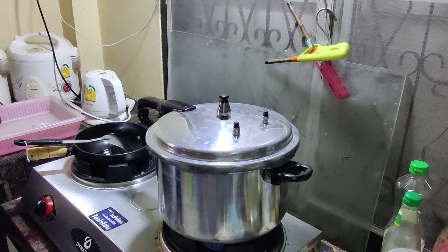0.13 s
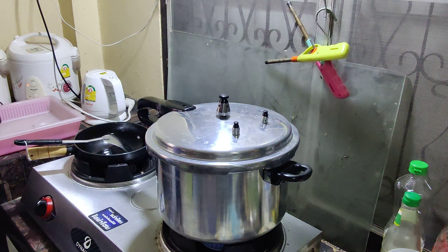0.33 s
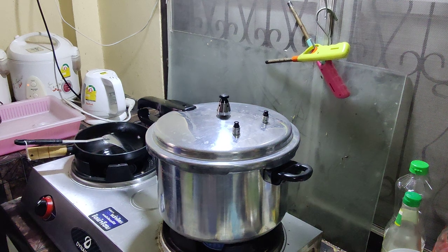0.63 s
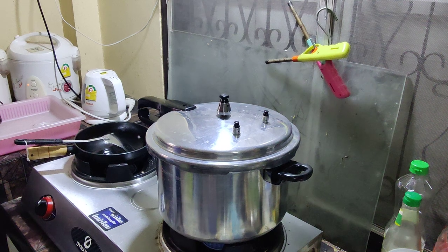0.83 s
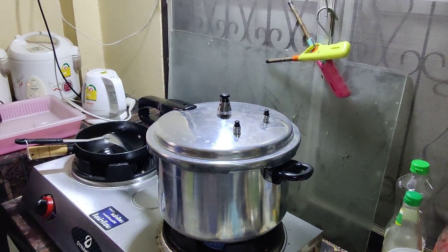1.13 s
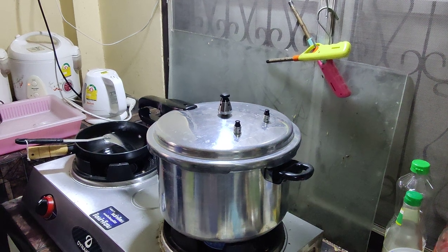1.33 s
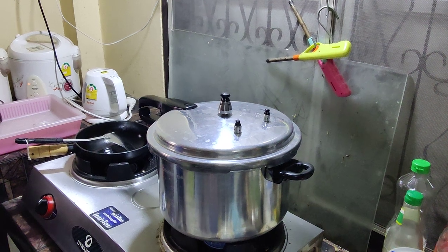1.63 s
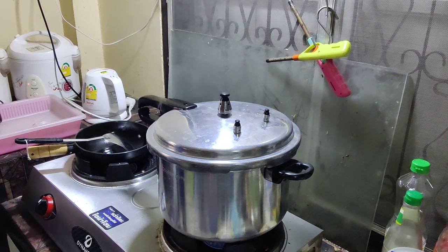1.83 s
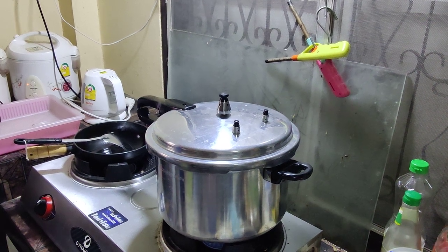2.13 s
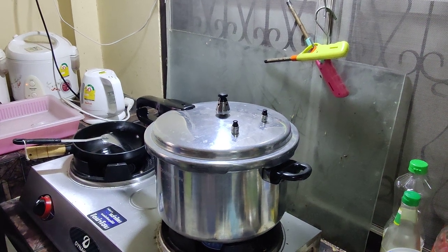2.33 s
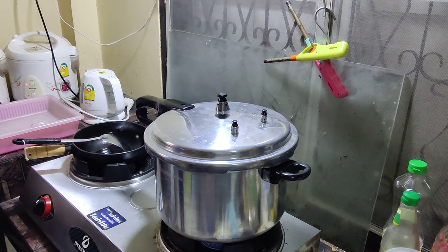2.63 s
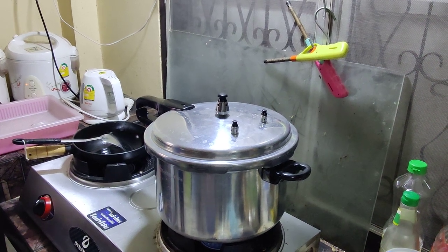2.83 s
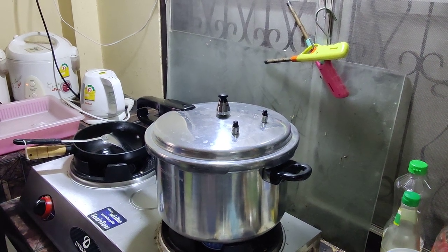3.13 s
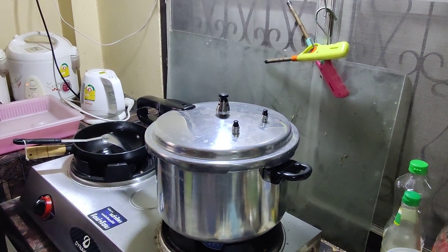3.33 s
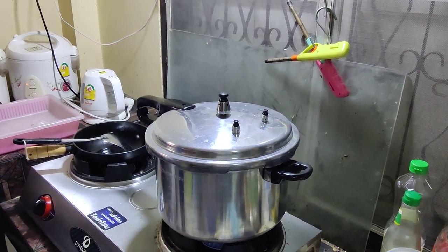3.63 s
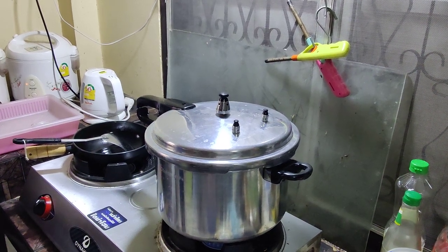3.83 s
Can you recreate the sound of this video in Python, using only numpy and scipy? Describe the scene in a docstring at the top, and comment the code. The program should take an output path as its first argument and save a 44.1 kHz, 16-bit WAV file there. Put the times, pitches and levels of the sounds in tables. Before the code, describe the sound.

Rhythmic hissing steam puffs from a pressure cooker on a gas stove, a bird chirping later

```python
"""Pressure cooker on a gas ring.

A weight valve in a small kitchen lets out soft puffs of steam almost four times a second: shaped stereo noise
over a steady leak. The flame rushes below as banded noise, faint wavering sines hum, and two deep
sines drone, swelling and sinking. Outside a bird gives five falling chirps with thin notes between, as gliding sines.
The sound fades in over the first second."""
import sys
import numpy as np
from scipy import signal
from scipy.io import wavfile

SR = 44100
rng = np.random.default_rng(int(sys.argv[2]) if len(sys.argv) > 2 else 0)


def master(y):
    """Save y as 16-bit WAV."""
    cut = np.clip(np.atleast_2d(y).T, -1, 1)
    pcm = np.round(cut * 32767)  # scale
    wavfile.write(sys.argv[1], SR, pcm.astype(np.int16))


N = 176400
TIME_S = np.arange(N) / SR


def from_db(db):
    """Decibels to amplitude gain."""
    return 10 ** (np.asarray(db) / 20)


def rms_one(x):
    """Scale to rms 1."""
    return x / np.sqrt(np.mean(x ** 2) + 1e-20)


def in_time(rows):
    """Interpolate (s, value) rows at every sample."""
    return np.interp(TIME_S, *np.transpose(rows))


def at_hz(points, hz):
    """Interpolate (Hz, value) rows on a log-frequency axis."""
    points_hz, values = np.transpose(points)
    return np.interp(np.log(hz), np.log(points_hz), values)


def pan(left_minus_right_db):
    """Left and right gains for a level difference, at constant power."""
    half_db = left_minus_right_db / 2
    return rms_one(from_db(np.array([[half_db], [-half_db]])))


def drift(rate_hz):
    """Random wander of rms 1: noise through two equal low-pass poles, run at SR / 40."""
    step, settle = 40, 2000
    pole = np.exp(-2 * np.pi * rate_hz * step / SR)
    noise = rng.standard_normal(N // step + 2 + settle)
    coarse = signal.lfilter([1], [1, -2 * pole, pole * pole], noise)[settle:]
    return np.interp(np.arange(N) / step, np.arange(len(coarse)), rms_one(coarse))


def tone(hz):
    """Sine of rms 1 whose phase integrates a pitch curve."""
    return np.sqrt(2) * np.sin(2 * np.pi * np.cumsum(hz) / SR)


# Left-right correlation of the noises. Each row: frequency in Hz, correlation from -1 to 1.
LIKENESS = [(60, 0.91), (130, 0.98), (290, 0.84), (640, 0.31), (1400, -0.29), (3100, 0.32), (6800, -0.12),
            (15000, 0.17)]


def banded_noise(spectrum, balance, patchy_db):
    """Stereo noise of rms 1 in narrow bands, each with its own level, flicker, pan and correlation."""
    edges_hz = np.concatenate([np.geomspace(22, 800, 11)[:-1], np.geomspace(800, 16500, 19)])
    white = rng.standard_normal((2, 2, N))
    out = 0
    for k, (low_hz, high_hz) in enumerate(zip(edges_hz, edges_hz[1:])):
        band = signal.butter(2, [low_hz, high_hz], "band", fs=SR, output="sos")
        mid, side = signal.sosfilt(band, white[k % 2])  # neighbouring bands use different noise
        hz = np.sqrt(low_hz * high_hz)
        alike = np.clip(at_hz(LIKENESS, hz), -1, 1)
        level = from_db(at_hz(spectrum, hz) + patchy_db * drift(14))
        stereo = np.sqrt(1 + alike) * mid + np.sqrt(1 - alike) * side * [[1], [-1]]
        out = out + level * pan(at_hz(balance, hz)) * stereo
    return rms_one(out)


def near_echoes(x, db, longest_s, count=12):
    """Quick reflections from hard things close by, different for each side, comb the sound."""
    out = x.copy()
    gain = from_db(db) / np.sqrt(count)
    for side in range(2):
        shares = rng.uniform(.1, 1, count)
        signs = rng.choice([-1, 1], count)
        for share, sign in zip(shares, signs):
            lag = 1 + int(share * longest_s * SR)
            out[side, lag:] += sign * gain * x[side, :-lag]
    return out / np.sqrt(1 + from_db(db) ** 2)


# Valve lifts. Each row: top of the puff in seconds, level in dB relative to PUFF_DB.
PUFFS = [(.226, -4), (0.488, -2.5), (.755, -.5), (1.021, -1.5), (1.288, -1.2), (1.555, -0.5), (1.822, 0.2),
         (2.092, 0.6), (2.36, .5), (2.625, 0), (2.906, -1.3), (3.01, -9), (3.175, -0.7), (3.261, -8.5),
         (3.452, -2), (3.724, -2), (3.99, -2)]
# Steam jet spectrum. Each row: frequency in Hz, relative density in dB per Hz.
STEAM = [(900, -17), (1800, -12.5), (3000, -4.5), (4000, -4.5), (4800, -5), (5600, -2.5), (6400, 1),
         (7500, -2), (8500, -8.5), (10500, -13.5), (13000, -12.5), (15000, -10)]
# Steam stereo balance. Each row: frequency in Hz, left minus right in dB.
STEAM_BALANCE = [(1000, -3.5), (2800, -7.5), (4800, -4), (6100, 5), (7000, -9.5), (8000, -12.5), (10000, 1),
                 (11500, -8), (15000, -0.5)]
PUFF_RISE_S, PUFF_FALL_S, PUFF_SHAPE = 0.065, 0.052, 1.2
PUFF_DB, LEAK_DB = -31.5, -49
SPUTTER_DB, SPUTTER_HZ = 0.82, 59.6  # quick unsteadiness of the jet


def steam():
    """The jet swells and sinks each time the weight lifts, over a steady leak; their powers add."""
    power = from_db(LEAK_DB) ** 2
    for top_s, db in PUFFS:
        away = np.maximum((top_s - TIME_S) / PUFF_RISE_S, (TIME_S - top_s) / PUFF_FALL_S)
        puff = from_db(PUFF_DB + db) * np.exp(-np.abs(away) ** PUFF_SHAPE)
        power = power + puff ** 2
    sputter = from_db(SPUTTER_DB * drift(SPUTTER_HZ))
    jet = np.sqrt(power) * sputter * banded_noise(STEAM, STEAM_BALANCE, patchy_db=1.35)
    return near_echoes(jet, db=-4, longest_s=.012)  # pot, glass and walls


# Gas flame spectrum. Each row: frequency in Hz, relative density in dB per Hz.
FLAME = [(25, 23.5), (60, 19), (100, 11), (150, 4.5), (190, 5.5), (270, 3), (400, -1.5), (680, -3),
         (1050, 1.5), (1400, -2.5), (2000, 0), (2800, -3), (4200, -8.5), (7000, -7.5), (11000, -31),
         (15000, -33)]
# Flame stereo balance. Each row: frequency in Hz, left minus right in dB.
FLAME_BALANCE = [(130, -1), (640, -0.5), (1400, -1), (2800, -8.5), (5000, -1), (12000, -13)]
# Flame level. Each row: time in seconds, level in dB.
FLAME_LEVEL = [(0, -41.5), (1, -35), (1.6, -36), (2.3, -34), (3, -35), (4, -32)]


def flame():
    """The rush of the burner: banded noise under a gently varying level."""
    return from_db(in_time(FLAME_LEVEL)) * banded_noise(FLAME, FLAME_BALANCE, patchy_db=1.0)


# Hum lines. Each row: mean frequency in Hz, mean level in dB.
HUM = [(119.7, -46.5), (197.5, -56.5), (269, -60), (300, -58), (360, -62)]
HUM_WAVER_DB, HUM_WAVER_HZ = 1.2, .3


def hum():
    """A few faint sines, wavering in level and pitch."""
    out = 0
    for hz, db in HUM:
        level = from_db(db + HUM_WAVER_DB * drift(5.4))
        out = out + level * tone(hz + HUM_WAVER_HZ * drift(2.05))
    return out


# Lower drone tone. Each row: time in seconds, level in dB.
DRONE_LOW = [(0.2, -40), (0.33, -29.5), (0.61, -51), (0.88, -32.5), (0.93, -41), (1.41, -27), (1.45, -40),
             (2.56, -36), (2.7, -17.5), (2.85, -23.5), (3.0, -39), (3.28, -37.5), (3.36, -19),
             (3.47, -19.5), (3.55, -29.5), (3.67, -18.5), (3.98, -42.5), (4.0, -52)]
# Upper drone tone. Each row: time in seconds, level in dB before DRONE_HIGH_DB, pitch in Hz before wander.
DRONE_HIGH = [(0.2, -42.5, 60.8), (0.37, -43, 61.5), (0.48, -28.5, 64.2), (0.63, -26, 61.6),
              (1.35, -38.5, 61.32), (1.42, -31.5, 61.6), (1.58, -74, 64.9), (1.64, -37, 64.1),
              (1.73, -47, 62.52), (1.98, -27.5, 64.24), (2.22, -34.5, 63.8), (2.34, -26.5, 61.5),
              (2.57, -39, 60.05), (3.03, -28.5, 64.0), (3.3, -36.5, 65.1), (3.4, -36.5, 61),
              (3.91, -40.5, 61.25), (4.0, -60, 60.5)]
DRONE_LOW_HZ, DRONE_WANDER_HZ = 37.36, 1.365
DRONE_HIGH_DB = 1  # added to the upper tone


def drone():
    """Two deep sines swell and sink, unsteady in pitch."""
    time_s, high_db, high_hz = np.transpose(DRONE_HIGH)
    low_pitch = DRONE_LOW_HZ + DRONE_WANDER_HZ * drift(3.7)
    low = from_db(in_time(DRONE_LOW)) * tone(low_pitch)
    high_level = from_db(DRONE_HIGH_DB + np.interp(TIME_S, time_s, high_db))
    high_pitch = np.interp(TIME_S, time_s, high_hz) + DRONE_WANDER_HZ * drift(4.26)
    return low + high_level * tone(high_pitch)


ROOM_T60_S = .45


def kitchen(x):
    """Ten feedback delays a side: the hard walls of a small room."""
    out = np.zeros((2, N))
    lags = (rng.uniform(0.01, 0.041, 20) * SR).astype(int)
    for k, lag in enumerate(lags):
        loop = x.copy()
        gain = from_db(-60 * lag / SR / ROOM_T60_S)
        for i in range(lag, N, lag):
            loop[i:i + lag] += gain * loop[i - lag:i][:N - i]
        out[k % 2] += (loop - x) * (-1) ** (k // 2)  # echoes only
    return out / np.sqrt(10)


# Bird chirps. Each row: time in seconds, level in dB, length factor.
CHIRPS = [(2.032, -36, 1), (2.380, -32.5, 1.01), (2.720, -31.5, .97), (3.085, -32, 1.3),
          (3.469, -33.5, 1.11)]
# Downward slur of every chirp. Each row: offset in seconds before the length factor, pitch in Hz, relative dB.
CHIRP_SHAPE = [(-.03, 4500, -21), (-.018, 4100, -18), (-.008, 3780, -15), (0, 3380, 0), (.008, 3030, 0),
               (.02, 2820, -2), (.031, 2520, -6), (.045, 2350, -22)]
# Thin notes around the chirps. Each row: centre in seconds, pitch in Hz, level in dB, half length to 1/e in seconds.
THIN_NOTES = [(1.92, 2980, -50, .06), (1.975, 5080, -49, .04), (2.312, 5030, -44, .016),
              (2.662, 5070, -43, .02), (3.015, 5070, -45, .035), (3.39, 5100, -52, .015)]
CHIRP_ROUGH, NOTE_ROUGH = .02, .0095  # rms pitch jitter, share of pitch
RASP_DB = 1.5


def bird():
    """Thin notes and slightly raspy slurs, jittered sines, come in from the right and ring in the room."""
    offset_s, shape_hz, shape_db = np.transpose(CHIRP_SHAPE)
    song = np.zeros(N)
    for chirp_s, db, length in CHIRPS:
        when_s = chirp_s + offset_s * length
        sounding = (TIME_S > when_s[0]) * (TIME_S < when_s[-1])
        level = from_db(db + np.interp(TIME_S, when_s, shape_db) + RASP_DB * drift(380)) * sounding
        pitch_hz = np.interp(TIME_S, when_s, shape_hz) * (1 + CHIRP_ROUGH * drift(301))
        song += level * tone(pitch_hz)
    for note_s, note_hz, db, width_s in THIN_NOTES:
        swell = np.exp(-((TIME_S - note_s) / width_s) ** 2)
        song += from_db(db) * swell * tone(note_hz * (1 + NOTE_ROUGH * drift(214)))
    direct = near_echoes(song * pan(-11), db=-5, longest_s=.025)
    room = from_db(-3) * kitchen(song) * pan(-6.5)
    return direct + room


def scene():
    """Everything in the kitchen together."""
    return steam() + flame() + hum() + drone() + bird()


# Fade-in. Each row: time in seconds, gain in dB.
FADE = [(.062, -56), (.072, -22), (.2, -10.5), (.3, -5), (.5, -4.5), (.75, -2.5), (1, 0)]
CUTOFF_HZ = 15500


def record(dry):
    """The level fades in and a steep low-pass cuts the top."""
    low_pass = signal.ellip(12, .2, 80, CUTOFF_HZ, fs=SR, output="sos")
    return signal.sosfilt(low_pass, dry * from_db(in_time(FADE)))


dry = scene()
out = record(dry)
master(out)
```